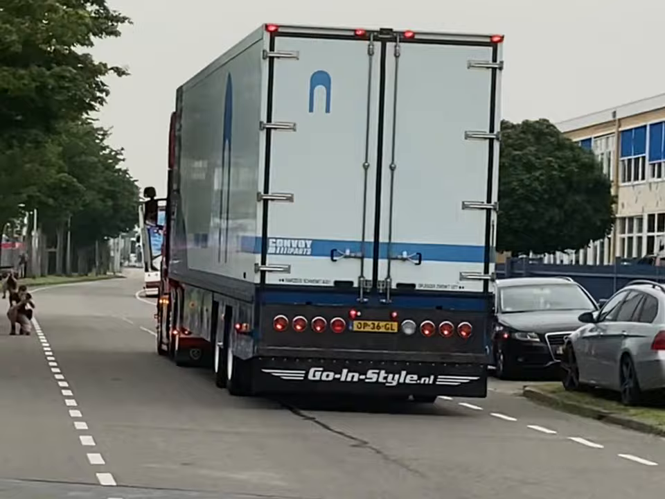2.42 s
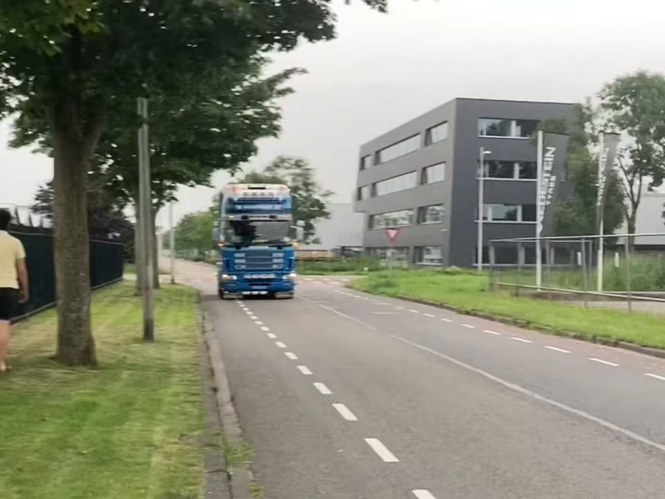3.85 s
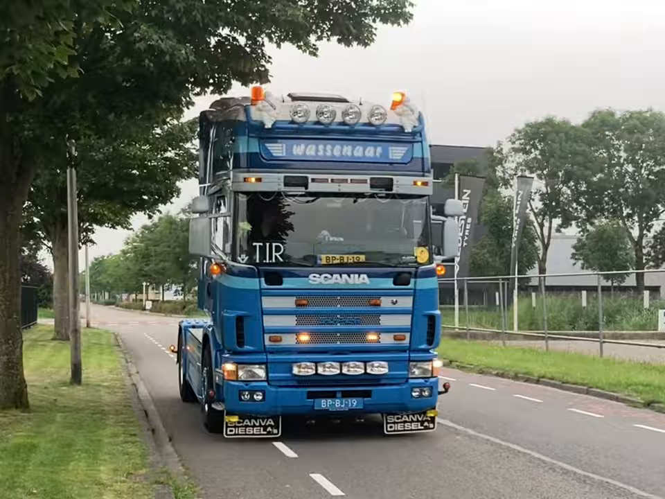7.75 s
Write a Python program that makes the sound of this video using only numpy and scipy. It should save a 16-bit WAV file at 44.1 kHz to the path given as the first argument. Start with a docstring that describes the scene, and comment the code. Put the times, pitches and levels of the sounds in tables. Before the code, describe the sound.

Outdoors beside an open road, close stereo microphone, no noticeable echo. From 0 to 3.9 seconds a heavy diesel truck drives away: deep booming exhaust tones, strongest at the very start, thick rumble, rattling bodywork, valve clatter and airy hiss, at a nearly steady engine speed that rises only slightly, gradually getting quieter. At about 3.9 seconds the sound cuts abruptly to a second truck at higher revs. Its pitch climbs and it gets louder, with a hollow metallic ring in the exhaust and a breathy turbo whistle, reaching a rough, rapid barking burst around 4.9 seconds. After 5.1 seconds the driver lifts off; engine pitch and whistle slide down until about 6.3 seconds. The engine then rises slightly and rolls on, softer, lumpy and low, with a brief dip in the bass near 7.3. Tiny high squeaks appear from 6.8, and a rough chattering rasp swells from 7.3 to the end near 8 seconds.

```python
"""The verge of an open road: two heavy diesel trucks, heard through a pair of close microphone ports.
The first drives away at a nearly steady engine speed; the sound then cuts to the second, which revs up,
lifts off for a gear change and rolls on. Exhaust tones are sinusoids locked to the crankshaft; rumble, bodywork,
valve clatter and air hiss are filtered noise gated by its turns. The second truck adds a ringing, barking stack
and a turbocharger of narrow-band noise; near the end come a few sinusoidal squeaks and a chattering noise rasp."""
import sys
import numpy as np
from scipy import signal
from scipy.fft import rfft, irfft, next_fast_len
from scipy.io import wavfile
from scipy.ndimage import uniform_filter1d, map_coordinates

SR = 44100
rng = np.random.default_rng(int(sys.argv[2]) if len(sys.argv) > 2 else 0)


def store_wav(level_fs):
    """Save 16-bit WAV to argv[1]."""
    pcm = np.round(np.clip(np.atleast_2d(level_fs), -1, 1) * 32767)
    wavfile.write(sys.argv[1], SR, pcm.T.astype(np.int16))


def volts(x):
    """Linear amplitude factor 10**(x/20) for a level x in dB, scalar or array-like."""
    e = np.asarray(x, float) / 20
    return 10 ** e


N = 351036
CUT_S = 3.876  # the second truck takes over


def unit(x):
    """Power normalisation: the mean of the channels is scaled to rms 1."""
    return x / np.sqrt(np.mean(np.atleast_2d(x).mean(0) ** 2) + 1e-20)


def along(points, hz):
    """Spectral envelope: (Hz, dB) points joined on a log frequency axis, silent outside."""
    f, v = np.transpose(points)
    return np.interp(np.log(hz + 1), np.log(f + 1), v, left=-120, right=-120)


def curves(rows):
    """Piecewise-linear control: one value per sample for each column after the time."""
    s, *cols = np.transpose(rows)
    return [np.interp(np.arange(N) / SR, s, c) for c in cols]


def wobble(rate):
    """Band-limited random modulation: a smooth curve through normal draws, rate knots a second."""
    knots = rng.standard_normal(int(N * rate / SR) + 4)
    coarse = map_coordinates(knots, [np.arange(0, N + 64, 64) * rate / SR], mode="nearest")
    return np.interp(np.arange(N), np.arange(len(coarse)) * 64, coarse)


def bell(middle_s, wide_s):
    """Gaussian envelope: a bell-shaped swell, 0-1."""
    return np.exp(-((np.arange(N) / SR - middle_s) / wide_s) ** 2)


def burst():
    """Transient envelope: the stack barks just before the driver lifts off."""
    return bell(4.92, .135)


def shaft(speed, bark_s):
    """Phase as the integral of speed: crankshaft turns, counted from one bark of the exhaust."""
    turns = np.cumsum(speed) / SR
    return turns - turns[round(bark_s * SR)]


# Balance of left and right. Each row: frequency in Hz, left minus right in dB.
LEFT_MINUS_RIGHT = [(60, 1), (120, 1.5), (240, 0.5), (480, 3), (950, 3), (1890, 0), (3770, 0.0), (7520, 1),
                    (15000, 7.5)]
# Stereo image of the treble: the likeness stays mostly high while the left lead rises in steps, with plateaus
# near whole half cycles. Each row: frequency in Hz, left-right likeness 0-1, half cycles by which left leads.
TREBLE_LIKENESS = [(5300, .9, .97), (5700, .95, 1.03), (7000, .9, 1.5), (7700, .98, 1.97),
                   (9000, .98, 2.03), (10200, .85, 2.5), (11000, .99, 2.98), (12800, .99, 3.02),
                   (13300, .8, 3.5), (13800, .98, 4)]


def rush(spectrum, ports, patchy_db, stripe_db=0, cycle=0):
    """Partial coherence: noise, plus any repeating pattern, is partly alike and out of step at left and right."""
    z = signal.stft(rng.standard_normal((2, N)) + cycle, nperseg=1024)[2]

    def field(bins, frames):
        """Smoothed random field: level patches over frequency and time, rms 1."""
        smooth = uniform_filter1d(rng.standard_normal(z.shape[1:]), bins, axis=0)
        smooth = uniform_filter1d(smooth, frames, axis=1)
        return unit(smooth.ravel()).reshape(z.shape[1:])

    # short patches flicker; long narrow stripes are slow random level differences between near frequencies
    gain_db = patchy_db * field(6, 6) + stripe_db * field(2, 60)
    pair = signal.istft(z * volts(gain_db), nperseg=1024)[1][:, :N]
    m = next_fast_len(N + SR // 4)
    hz = np.fft.rfftfreq(m, 1 / SR)
    at, alike, lead = np.transpose(ports + TREBLE_LIKENESS)
    # mixing shared and opposed noise at this angle gives the wanted likeness
    angle = np.arccos(np.clip(np.interp(hz, at, alike), 0, 1)) / 2
    shared, opposed = rfft(pair, m) * volts(along(spectrum, hz)) * [np.cos(angle), np.sin(angle)]
    balance_hz, balance_db = np.transpose(LEFT_MINUS_RIGHT)
    balance = volts(np.interp(np.log(hz + 1), np.log(balance_hz), balance_db) / 2)
    tilt = balance * np.exp(.5j * np.pi * np.interp(hz, at, lead))
    return irfft([(shared + opposed) * tilt, (shared - opposed) / tilt], m)[:, :N]


# Single exhaust tones that swell and fade above the others.
# Each row: middle in seconds, length in seconds, pitch in Hz (moved to the nearest half order), peak level in dB.
BOOMS = [(0.147, 0.83, 127, -22), (.2, 1.8, 127, -29.5), (0, 1.4, 158, -31.5), (0.52, 2.4, 65, -29),
         (1.437, 0.54, 132, -30.5), (1.697, 2.4, 83, -35.5), (2.376, 0.71, 67, -36),
         (3.558, 0.6, 68, -31.5), (.7, 1.4, 195, -41.5), (1.013, 2.8, 262, -45.5), (4.15, 0.37, 205, -36),
         (4.313, 0.35, 183, -33), (4.3, .24, 262, -32.5), (4.46, 0.19, 260, -32), (4.796, 0.27, 116, -22),
         (4.28, .25, 235, -40), (4.904, 0.36, 270, -31.5), (5.07, 0.29, 245, -30),
         (4.148, 0.53, 103, -17.5), (4.094, 0.56, 76, -35), (4.395, 0.32, 80, -20.5),
         (4.49, 0.15, 137, -27), (4.538, 0.35, 111, -13), (4.743, 0.43, 86, -20), (4.95, 0.53, 151, -26),
         (5.017, 0.38, 91, -20), (5.035, 0.43, 122, -15), (5.08, 0.37, 61, -30), (5.039, 0.23, 184, -29.5),
         (5.37, 0.61, 136, -26.5), (5.407, 0.65, 81, -20), (5.46, 0.38, 108, -24.5),
         (5.723, 0.36, 95, -26.5), (5.842, 0.32, 137, -25.5), (6.183, 0.25, 77, -27.5),
         (6.33, 0.12, 93, -27.5), (6.457, 0.13, 55, -30), (2, 4.5, 50, -43), (3.3, 1.3, 85, -40.5),
         (3, 0.55, 67, -44), (1.65, .5, 298, -45.5), (.1, 0.47, 300, -43.5), (.2, 0.5, 238, -44.5),
         (2.65, .6, 202, -44), (2.697, 0.29, 178, -39.5), (3.73, 0.31, 118, -37), (2.23, .25, 85, -35.5),
         (1.25, 0.43, 92, -38), (2.806, 0.84, 336, -44), (3.047, 0.77, 253, -46.5),
         (3.54, 0.46, 271, -43.5), (1.5, 0.64, 116, -39), (4, 0.24, 304, -35), (4.042, 0.27, 127, -37),
         (4.283, 0.22, 312, -38), (4.447, 0.23, 322, -37), (4.607, 0.18, 447, -36.5),
         (4.62, 0.23, 268, -32), (4.694, 0.39, 169, -32.5), (4.704, 0.4, 142, -32.5),
         (4.71, 0.16, 313, -34.5), (4.933, 0.15, 604, -42), (4.955, 0.17, 360, -38.5),
         (5.348, 0.32, 260, -36), (5.534, 0.14, 399, -42), (5.95, 0.21, 86, -31), (5.96, 0.31, 108, -32),
         (5.99, 0.16, 139, -27), (6.124, 0.29, 107, -34), (6.423, 0.22, 139, -31), (6.674, 0.36, 75, -34),
         (6.85, .2, 115, -34), (7, 0.19, 139, -33), (7.056, 0.34, 101, -37), (7.38, 0.16, 121, -37),
         (7.446, .2, 80, -32.5), (7.62, .14, 72, -32), (7.76, 0.17, 81, -36.5), (7.797, 0.26, 192, -44),
         (6.101, .2, 255, -38), (7.854, 0.17, 128, -38)]


def booms(speed, start_s, end_s):
    """Order tracking: gain over time that the swells add to each half order of the crankshaft."""
    t, gain = np.arange(N) / SR, {}
    for s, length, hz, db in BOOMS:
        if start_s <= s < end_s:
            order = round(2 * hz / speed[round(max(s, 0) * SR)]) / 2
            swell = np.cos(np.pi * np.clip((t - s) / length, -.5, .5))
            gain[order] = gain.get(order, 0) + volts(db) * swell
    return gain


# What the pipe lets through of the high tones. Each row: frequency in Hz, gain in dB.
PIPE = [(30, -8), (100, 3.5), (190, 1), (270, -3), (330, -3.5), (400, -3), (520, -16), (650, -26)]


def exhaust(turns, swells, low, top, low_db, high_db, waver_db, drift):
    """Order synthesis: uneven firing of eight cylinders gives tones at half orders, delayed and dispersed by the pipe."""
    lag, spread = .63, .3  # delay in turns, phase bend in radians per squared order
    half_order_db, uneven_db = -9, 1.5  # high tones: half orders under whole ones, scatter
    lump_db, growl_db = 3, 2.5  # swelling tones: scatter as drift grows, flutter above the eighth order
    out, speed = 0, np.gradient(turns) * SR
    lumps = volts(lump_db * (drift / drift.min() - 1) * wobble(16))  # off the throttle the firing comes in lumps
    for k in np.arange(2, top + .5, .5):
        pipe_db = np.interp(k * speed, *np.transpose(PIPE))
        high = high_db + half_order_db * (k % 1 > 0) + pipe_db + uneven_db * rng.standard_normal()
        steady = volts((low_db if k in low else high) + waver_db * wobble(6))
        growl = volts(growl_db * wobble(12) if k > 8 else 0)
        gain = steady + swells.get(k, 0) * lumps * growl
        phase = 2 * np.pi * k * (turns - lag) + spread * k * k + drift * np.sqrt(k) * wobble(2.011)
        out = out + gain * np.sqrt(2) * np.cos(phase)
    return out


def knocks(turns, depth, sharp, scatter_db):
    """Amplitude modulation at mean power near 1: once a turn a sudden, dying bark, each time at a new strength."""
    whole = np.floor(turns)
    phase = turns - whole
    strengths = volts(scatter_db * rng.standard_normal(int(np.ptp(whole)) + 1))
    size = strengths[(whole - whole.min()).astype(int)]
    bark = size * np.exp(-2 * sharp * phase) * (1 - np.exp(-25 * phase))
    depth = np.clip(depth, 0, 1)
    return np.sqrt(1 - depth + depth * bark ** 2 / np.mean(bark ** 2))


def truck(turns, swells, low, top, drive, layers, tone, ports, knock, waver_db, drift):
    """Superposition of crank-locked sources: (tones, rumble, bodywork and clatter), and hiss apart."""
    near_db, throttle = curves(drive)
    low_db, high_db, rumble_db, body_db, clatter_db, hiss_db = (
        db + near * near_db + pull_db * throttle for db, near, pull_db in layers)
    depth = knock + .14 * burst()  # share of knocking in the bodywork, 0-1
    loose = drift * (1 + .6 * (1 - throttle))  # tones drift more off the throttle
    pipe = exhaust(turns, swells, low, top, low_db, high_db, waver_db, loose)
    pipe = pipe * volts([[.45], [-.45]])  # slightly louder on the left

    lope = .16 * (1 - throttle)  # share of the rumble that thumps once every two turns
    rumble = unit(rush(tone[0], ports, patchy_db=1.2))
    rumble = rumble * knocks(turns / 2, lope, sharp=1.2, scatter_db=1.5) * volts(rumble_db + 1.2 * wobble(8))

    pattern = rng.standard_normal(4096)[(turns / 2 % 1 * 4095).astype(int)]  # same shaking every two turns
    body = unit(rush(tone[1], ports, patchy_db=0.5, stripe_db=1.6, cycle=0.75 * pattern))
    body = body * knocks(turns, depth, sharp=0.6, scatter_db=2.5)
    clatter = unit(rush(tone[2], ports, patchy_db=1.5, stripe_db=2.3))
    clatter = clatter * knocks(turns, .6 * depth, sharp=1.8, scatter_db=1.5)
    hiss = unit(rush(tone[3], ports, patchy_db=1.2, stripe_db=1.2))
    hiss = hiss * knocks(turns, .3 * depth, sharp=1.8, scatter_db=1.5)

    bottom = pipe + rumble
    deep = signal.filtfilt(*signal.butter(2, 2 * 150 / SR), bottom)  # below about 150 Hz
    lull = 1 - volts(-7 * bell(7.27, .09))  # the low end dips briefly
    lower = bottom - lull * deep + volts(body_db) * body + volts(clatter_db) * clatter
    return lower, volts(hiss_db + 0.62 * wobble(2.75)) * hiss


# How the first truck is driven. Each row: time in seconds, nearness in dB, throttle 0-1.
LEAVING_DRIVE = [(0, 0, 0.63), (.8, -0.5, 1), (1.4, -0.5, 0), (2.2, -2, 0), (2.8, -4.5, 0.77),
                 (3.3, -6, 0.88), (3.87, -6, 0.7)]
# Its layers: low tones, high tones (both per tone), rumble, bodywork, clatter, hiss.
# Each row: level in dB at closed throttle and zero nearness, dB per dB of nearness, dB added by full throttle.
LEAVING_LAYERS = [(-40.5, 0.54, 0.5), (-46, 2, -3), (-35, 0, 7), (-33, 0.97, 0), (-40.5, 0.6, 0.2),
                  (-59.5, 0.78, 1.2)]
# Its spectra: rumble, bodywork, clatter, hiss. Each row: frequency in Hz, relative level in dB per Hz.
LEAVING_TONE = ([(15, -26), (25, -24), (54, -2), (80, 1.5), (133, -1), (220, -12), (259, -8.5), (340, -15),
                (440, -23.5), (750, -120)], [(300, -44.5), (340, -6), (440, -11.5), (580, 0), (740, -1.5),
                (860, -15.5), (1060, -6.5), (1220, -14.5), (1300, -25)], [(1200, -16.5), (1280, -7),
                (1500, -4), (1660, -11.5), (1850, -4.5), (2050, -10), (2600, -17), (2850, -17),
                (3400, -23.5), (4050, -17), (4400, -20), (5000, -38), (5400, -48)], [(4000, -31),
                (4800, -6), (5500, 1), (6400, -3.5), (7500, -4.5), (9000, -7), (10300, -11), (12000, -13.5),
                (13000, -18), (14500, -20), (15600, -34)])
# It at the ports. Each row: frequency in Hz, left-right likeness 0-1, half cycles by which left leads.
LEAVING_PORTS = [(40, 0, -0.46), (100, 0.89, 0.14), (302, 0.96, 0.037), (986, 0.99, -0.12),
                 (1700, 0.99, 0.037), (2010, 0.95, -0.02), (2470, 0.6, 0.22), (3560, 0.35, 0.4),
                 (4300, 0.2, 0.046)]


def leaving_truck():
    """Exponential approach: engine speed settles towards 17.03 turns a second while nearness falls overall."""
    cruise, short, gain_s = 17.03, 1.31, 1.45  # turns/s at last, turns/s under it at first, time constant
    speed = cruise - short * np.exp(-np.arange(N) / SR / gain_s)
    return truck(shaft(speed, bark_s=1.18), booms(speed, -1, CUT_S), low=(3, 4, 5, 7, 8), top=21,  # orders
                 drive=LEAVING_DRIVE, layers=LEAVING_LAYERS, tone=LEAVING_TONE, ports=LEAVING_PORTS,
                 knock=0.22, waver_db=1.5, drift=0.2)  # drift in radians per root order at full throttle


# Engine speed of the second truck. Each row: time in seconds, crankshaft turns per second.
REVVING_SPEED = [(3.88, 24.8), (4.27, 26), (4.48, 27.4), (4.81, 29.1), (4.92, 30.1), (5.1, 30.7),
                 (5.19, 30.1), (5.3, 27.8), (5.45, 26.9), (5.55, 25.4), (5.98, 21.4), (6.16, 19.3),
                 (6.36, 18.4), (6.65, 18.7), (7.1, 20.2), (7.96, 20.1)]
# How it is driven. Each row: time in seconds, nearness in dB, throttle 0-1.
REVVING_DRIVE = [(3.88, -1, 0.86), (4.25, -1.5, 0.92), (4.65, 2, 0.95), (4.98, 5.5, 0.8), (5.15, 4.5, 0.55),
                 (5.55, 4, 0.41), (6, 2.5, 0.36), (6.4, 1.5, 0.12), (6.9, 1, 0.086), (7.12, 0.5, 0.011),
                 (7.26, 1.5, 0.035), (7.42, 0.5, 0.048), (7.96, 0.5, 0)]
# Its layers: low tones, high tones (both per tone), rumble, bodywork, clatter, hiss.
# Each row: level in dB at closed throttle and zero nearness, dB per dB of nearness, dB added by full throttle.
REVVING_LAYERS = [(-41.5, 0.37, 6.8), (-58.5, 0.58, 17.8), (-32.5, 0.46, 8.6), (-38.5, 0.71, 4.7),
                  (-45.5, 0.49, 9.15), (-51.5, 1, .1)]
# Its spectra: rumble, bodywork, clatter, hiss. Each row: frequency in Hz, relative level in dB per Hz.
REVVING_TONE = ([(15, -39), (25, -24), (55, -1.5), (95, -2), (140, 1.5), (165, -8), (200, -12.5),
                (270, -11), (340, -23), (440, -55)], [(150, -31), (190, -12.5), (280, -11.5), (340, -8),
                (520, -7.5), (650, -3.5), (850, -15), (1020, -11), (1130, -16), (1250, -12.5), (1320, -43)],
                [(1200, -6.5), (1300, -1), (1600, -5.5), (1950, -5), (2100, -8.5), (2300, -4.5),
                (2500, -10), (3200, -15.5), (3750, -15), (4400, -15.5), (5000, -25), (5400, -48)],
                [(2000, -11.5), (2800, 7.5), (4000, -4.5), (5200, 0.5), (6000, -1), (7600, -7), (9000, -6),
                (10300, -9.5), (12000, -10), (13000, -16), (14500, -16), (15600, -15)])
# It at the ports. Each row: frequency in Hz, left-right likeness 0-1, half cycles by which left leads.
REVVING_PORTS = [(40, 1, 0.12), (100, 1, -0.005), (403, 0.95, 0.11), (725, 0.96, 0.33), (840, 0.31, 0.99),
                 (1190, 0.86, -0.45), (1990, 0.41, -0.13), (2550, 0.51, -1.14), (3420, 0.38, -1.31),
                 (4000, 0.11, -0.54), (4340, 0.41, 0.8)]


def revving_truck():
    """Harmonic glide: every order follows engine speed as it revs up, lifts off for a gear change and rolls on."""
    speed = curves(REVVING_SPEED)[0]
    turns = shaft(speed, bark_s=4.92)
    lower, hiss = truck(turns, booms(speed, CUT_S, N / SR), low=(3, 4, 5, 6), top=21,
                        drive=REVVING_DRIVE, layers=REVVING_LAYERS, tone=REVVING_TONE, ports=REVVING_PORTS,
                        knock=0.2, waver_db=4.0, drift=0.42)
    return lower + stack(turns, throttle=curves(REVVING_DRIVE)[1]), hiss


# The stack's two spectra: ring, bark. Each row: frequency in Hz, relative level in dB per Hz.
STACK_TONE = [(880, -11.5), (975, -13.5), (1015, -6.5), (1055, -11.5), (1130, -29)], [(420, -25), (580, 10),
              (690, 13), (810, -8), (1020, 9), (1250, -14), (2200, -26)]


def stack(turns, throttle):
    """Resonance: the exhaust stack rings narrowly while the engine pulls; in the burst it barks once a turn."""
    ring_db = -35.5 - 22.5 * (1 - throttle)
    ring = unit(rush(STACK_TONE[0], REVVING_PORTS, patchy_db=1.5))
    ring = ring * knocks(turns, .3, sharp=1.2, scatter_db=1.5)
    # a pressure spike under a millisecond long, once a turn
    crack = 7 * np.exp(1200 * (np.cos(2 * np.pi * (turns - .02)) - 1))
    bark = unit(rush(STACK_TONE[1], REVVING_PORTS, patchy_db=.8, cycle=crack))
    bark = bark * knocks(turns + .06, .91, sharp=2.7, scatter_db=1)
    return volts(ring_db) * ring + volts(-37) * burst() * bark


# The turbocharger's whistle. Each row: time in seconds, centre frequency in Hz, level in dB.
TURBO = [(4.2, 7690, -64), (4.6, 8150, -54.5), (5.0, 8540, -55.5), (5.2, 8600, -52.5), (5.5, 8070, -55.5),
         (5.8, 7560, -55), (6.2, 7000, -90)]


def turbo():
    """Heterodyning: low-passed noise shifted up, a breathy whistle that climbs with the boost and sinks on lift-off."""
    hz, db = curves(TURBO)
    fuzz = rng.standard_normal(N) + 1j * rng.standard_normal(N)
    fuzz = signal.lfilter(*signal.butter(2, 560 / SR * 2), fuzz)  # 560 Hz to either side of the centre
    carrier = np.exp(2j * np.pi * np.cumsum(hz) / SR)
    return volts(db) * unit((fuzz * carrier).real)


# Short squeaks. Each row: start in seconds, length in seconds, frequency in Hz, peak level in dB before flutter.
SQUEAKS = [(6.825, .04, 4240, -47), (6.84, 0.045, 4400, -43), (6.885, 0.037, 4400, -48),
           (7.348, .04, 4500, -44), (7.39, .04, 4460, -48), (7.438, .05, 4420, -52), (6.91, .04, 4400, -57),
           (7.27, .04, 4460, -54), (7.08, .08, 4040, -52), (7.882, .04, 4100, -45), (7.91, .05, 4450, -46),
           (7.913, .045, 4170, -44)]


def squeaks():
    """Interaural phase difference: short unsteady tones, a little over a quarter cycle earlier on the left."""
    t, out = np.arange(N) / SR, np.zeros((2, N))
    flutter, sway = volts(1.5 * wobble(70)), .6 * wobble(80)  # of level, of phase in radians
    lead = np.array([[.9], [-.9]])  # radians
    for s, length, hz, db in SQUEAKS:
        swell = np.sin(np.pi * np.clip((t - s) / length, 0, 1))
        out += volts(db) * swell * flutter * np.sin(2 * np.pi * hz * t + sway + lead)
    return out


# A rasp from the side. Each row: time in seconds, level in dB.
RASP = [(7.2, -72), (7.33, -46), (7.5, -40.5), (7.75, -36.5), (7.96, -34.5)]
# Its spectrum. Each row: frequency in Hz, relative level in dB per Hz.
RASP_TONE = [(650, -3), (900, -15), (1200, -1.5), (1300, -9), (1450, -5), (1700, -6.5), (1950, -1.5),
             (2200, -23.5), (2600, -14)]
# It at the ports. Each row: frequency in Hz, left-right likeness 0-1, half cycles by which left leads.
RASP_PORTS = [(800, 0.45, 0.82), (2000, 0.29, 0.51)]


def rasp():
    """Periodic gating of noise: rough bands chatter in from the side, perhaps another engine coming near."""
    beats_per_s, beat_s = 33.7, 7.823  # rate, and the start of one beat
    band = rush(RASP_TONE, RASP_PORTS, patchy_db=1.2, stripe_db=1.5)
    beats = knocks((np.arange(N) / SR - beat_s) * beats_per_s, .65, sharp=1.4, scatter_db=3.5)
    return volts(curves(RASP)[0] + 1.2 * wobble(75)) * beats * band / band.std()


def scene():
    """Cross-fading: the first truck up to the cut, the second after it, the hiss changing over more slowly."""
    t = np.arange(N) / SR
    first, first_hiss = leaving_truck()
    second, second_hiss = revving_truck()
    after = np.clip((t - CUT_S) / 0.0078 + .5, 0, 1)
    fade = np.clip((t - CUT_S) / 0.33 + .5, 0, 1)
    treble = np.sqrt(1 - fade) * first_hiss + fade * second_hiss
    return treble + (1 - after) * first + after * (second + turbo() + squeaks() + rasp())


def band_limit(x):
    """A steep low-pass at the top of the band."""
    return signal.sosfilt(signal.butter(12, 16150, fs=SR, output="sos"), x)


def record(dry):
    """Superposition completed: the finished stereo mix goes out as one signal."""
    return band_limit(dry)


dry = scene()
out = record(dry)
store_wav(out)
```